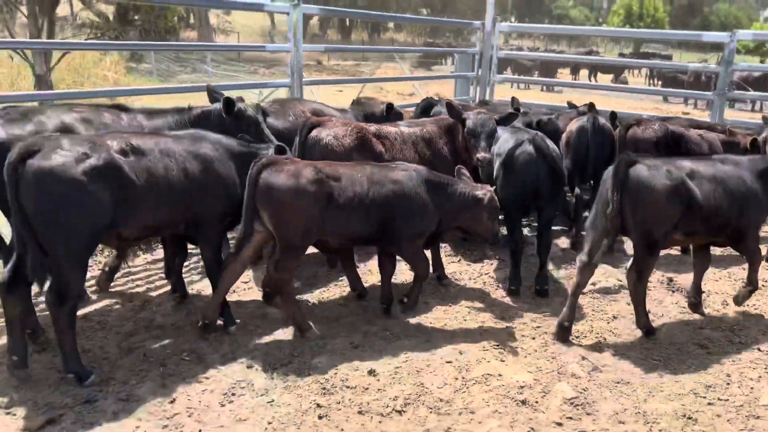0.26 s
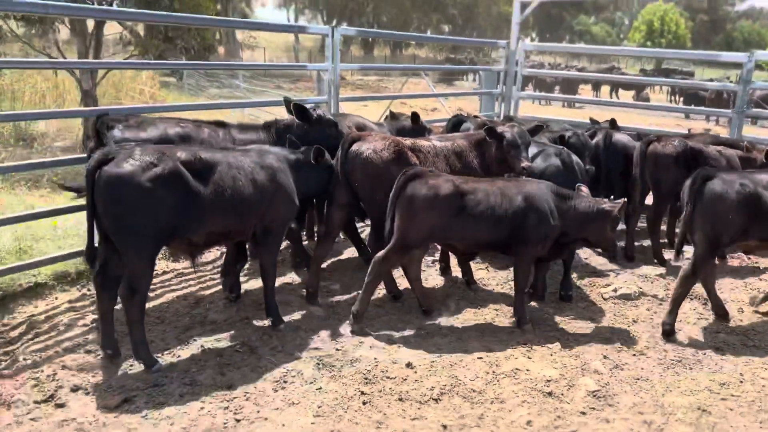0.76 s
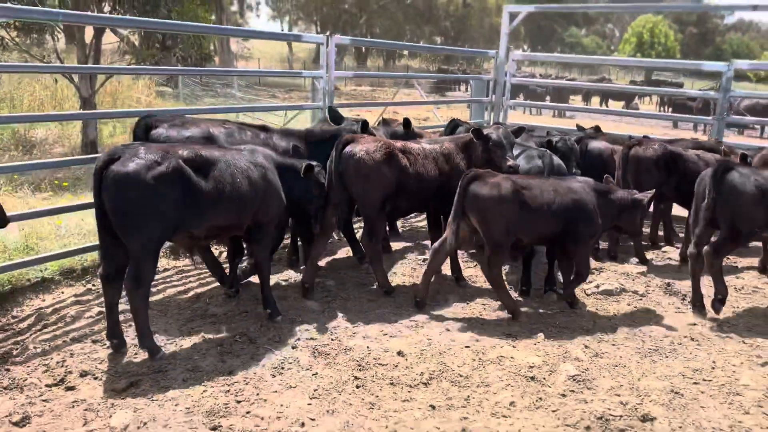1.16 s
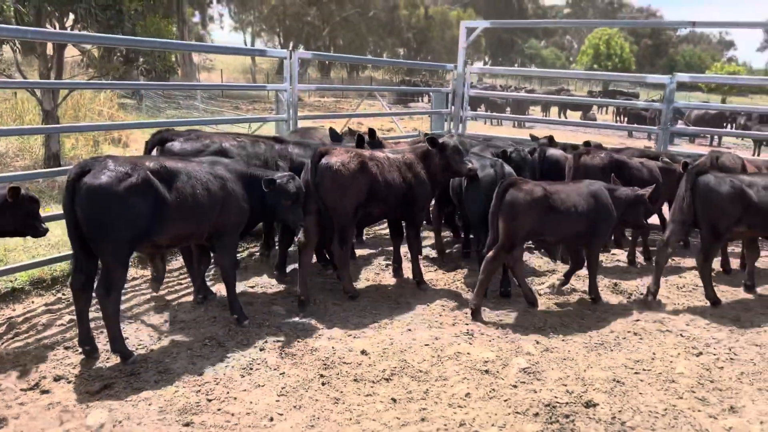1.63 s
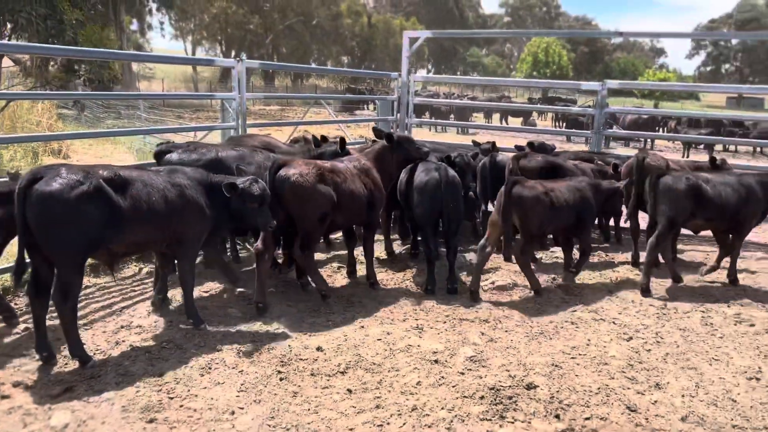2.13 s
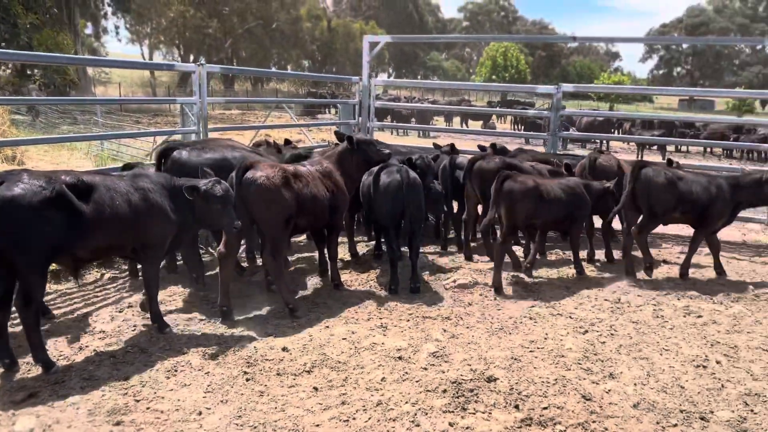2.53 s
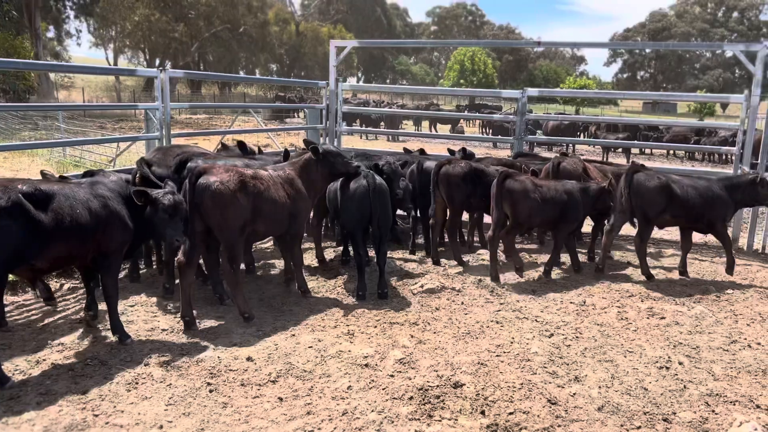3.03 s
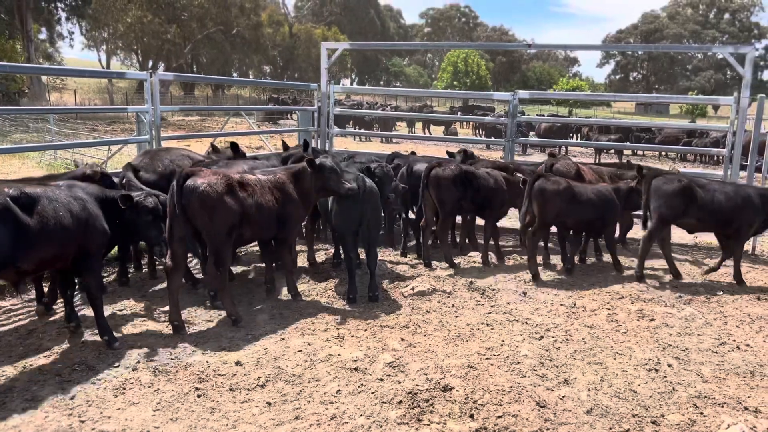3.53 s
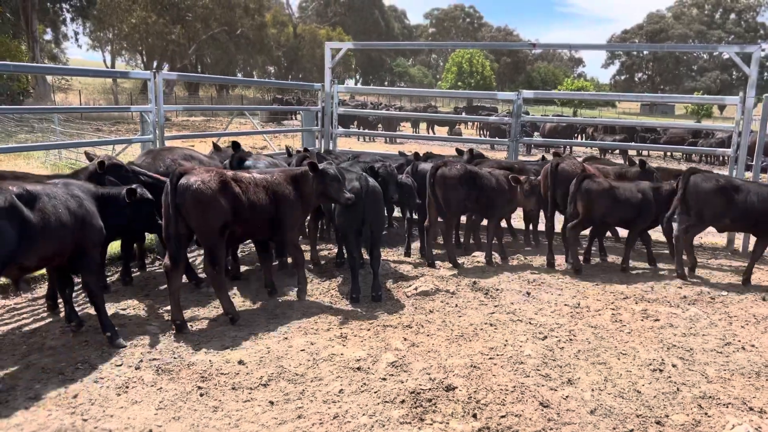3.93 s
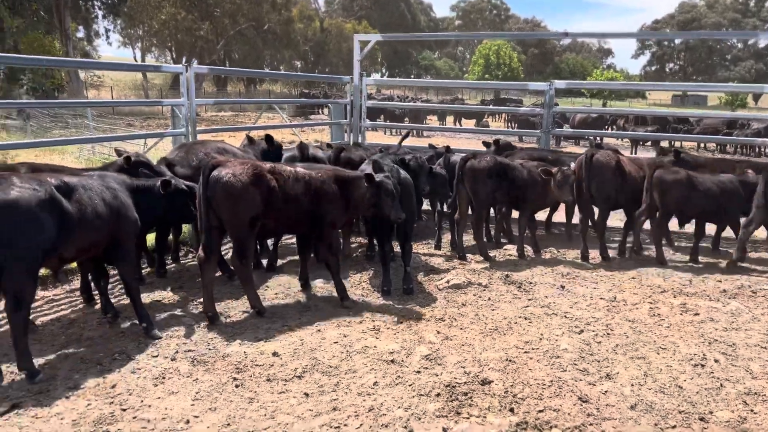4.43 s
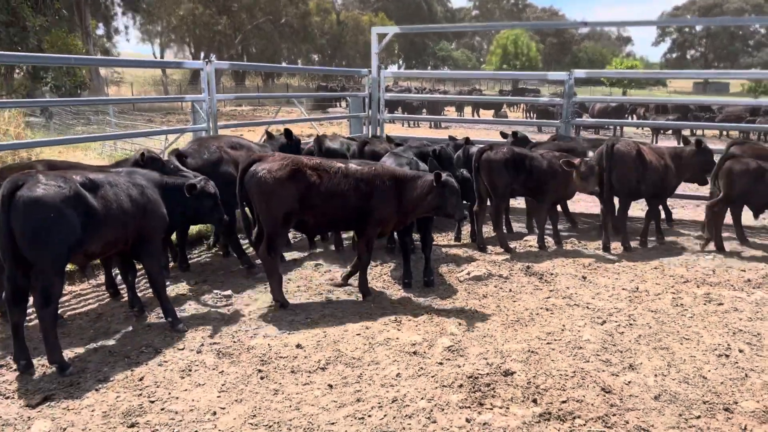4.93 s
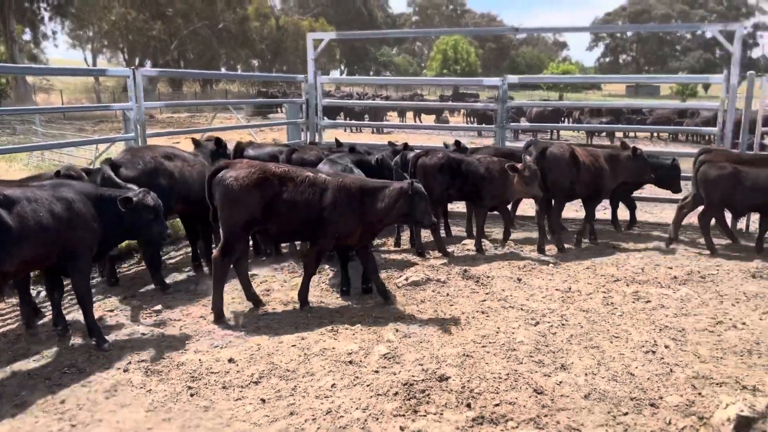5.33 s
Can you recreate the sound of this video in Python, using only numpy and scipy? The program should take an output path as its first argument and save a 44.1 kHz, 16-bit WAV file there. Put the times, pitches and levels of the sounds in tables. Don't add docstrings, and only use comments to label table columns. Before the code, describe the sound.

A breezy open cattle yard, heard through a small stereo microphone with low wind rumble and soft scuffing on dry dirt. At 0 s the tail of a loud, shrill calf bawl breaks roughly and stops by 0.25 s; a distant breathy call answers until 0.5. Gusts buffet around 0.4 and thump hard at 1.0, over a faint low moo. A tiny rising yelp at 0.9 leads into a high, buzzing two-voiced cry with a whistling edge, 1.0 to 1.6. The wind drops; hooves knock softly near 2.1. A growling low moo climbs from 2.2 to 2.9, joined by a clear mid-pitched call, 2.6 to 3.5, and blurred far lowing. Hard knocks land at 3.5 and 3.9, then a faint snort. From 4.0 a near animal hums, opening at 4.55 into a deep bawl; another rises across it, loudest near 5.4, then cracks downward by 5.6. Grit ticks, brief scrapes and short echoes surround them.

```python
import sys
import numpy as np
from scipy import signal
from scipy.io import wavfile
from scipy.ndimage import uniform_filter1d

SR = 44100
rng = np.random.default_rng(int(sys.argv[2]) if len(sys.argv) > 2 else 0)


def transcribe(signal):
    frames = np.atleast_2d(signal).T
    limited = np.clip(frames, -1, 1)
    pcm = np.round(limited * 32767).astype(np.int16)
    wavfile.write(sys.argv[1], SR, pcm)


def how_loud(loudness_db):
    steps = np.asarray(loudness_db, float) / 20
    return 10 ** steps


N = 246078


def evened(x, size=None):
    power = np.mean(x ** 2) if size is None else uniform_filter1d(x ** 2, size)
    return x / np.sqrt(abs(power) + 1e-20)


def read(points, hz):
    f, value = np.transpose(points)
    return np.interp(np.log(hz + 1), np.log(f + 1), value)


def columns(rows, t):
    s, *rest = np.transpose(rows)
    return [np.interp(t, s, c) for c in rest]


def swells(base_db, rows, t):
    power = how_loud(base_db) ** 2
    for s, db, span in rows:
        power = power + how_loud(db - 20 * abs(t - s) / span) ** 2
    return np.sqrt(power)


def place(s, sound, pan_db, lag):
    out = np.zeros((2, N + len(sound) + 64))
    for side, late in ((0, max(-lag, 0)), (1, max(lag, 0))):
        at = round(s * SR + late)
        out[side, at:at + len(sound)] = sound * how_loud(pan_db * (.5 - side))
    return out[:, :N]


def noise(points, same, lag, size, patchy_db):
    frames, hz = 4 * N // size + 5, np.fft.rfftfreq(size, 1 / SR)
    a, b, c, d, patches = rng.standard_normal((frames, len(hz), 5)).T
    patches = uniform_filter1d(patches, size // 80, 0)
    patches = evened(uniform_filter1d(patches, 8192 // size, 1))
    late = np.exp(-2j * np.pi * hz * lag / SR)[:, None]
    left, other = a + 1j * b, c + 1j * d
    z = np.array([left, same * late * left + np.sqrt(1 - same ** 2) * other])
    inside = (hz >= points[0][0]) & (hz <= points[-1][0])
    z *= how_loud(read(points, hz)[:, None] + patchy_db * patches) * inside[:, None]
    return evened(signal.istft(z, nperseg=size, noverlap=3 * size // 4)[1][:, :N])


def resonate(x, hz, width):
    hz = np.clip(hz, 20, SR / 2 - 2000)
    return signal.lfilter(*signal.iirpeak(hz, hz / width, SR), x)


def burst(peak_db, hz, width, t60, rise, push=0.):
    t = np.arange(6000) / SR
    kick = rng.standard_normal(len(t)) * how_loud(-60 * t / max(t60, .005)) * np.minimum(t / rise, 1)
    kick = kick + push * (t == 0)
    ring = resonate(kick, hz, width)
    for _ in range(2):
        ring = resonate(ring, hz, 2 * width)
    return how_loud(peak_db) * ring / abs(ring).max()


def glide(x, hz, width):
    turn, r = np.exp(2j * np.pi * np.cumsum(hz) / SR), np.exp(-np.pi * width / SR)
    smooth = signal.lfilter([(1 - r) ** 2], [1, -2 * r, r * r], x / turn + 1e-18)
    return 2 * (turn * smooth).real


def folds(hz, jitter):
    wobble = evened(uniform_filter1d(rng.standard_normal(len(hz)), 500))
    turns = np.cumsum(hz * (1 + jitter * wobble)) / SR
    top = int(8000 / hz.mean())
    pulses = np.sin(np.pi * (2 * top + 1) * turns) / (np.sin(np.pi * turns) + 1e-12) - 1
    return turns, evened(pulses)


def through(drive, shape, open_db, jaw, sign):
    window = round(.03 * SR)
    drift = uniform_filter1d(rng.standard_normal((len(shape), len(drive))), window, axis=1)
    waver_db = 1.3 * evened(uniform_filter1d(drift, window, axis=1))
    out = 0
    for k, (hz, width, db) in enumerate(shape):
        upper = k > 0
        gain = sign ** k * how_loud(db + (waver_db[k] + open_db) * upper)
        out = out + gain * glide(drive, hz * jaw ** upper, 0.94 * width)
    return out


# share of breath while it holds (0-1), share at its end (0-1),
# length of the break in seconds.
ROUGHNESS = dict(shrill=(.09, .75, .13), moo=(.09, .1, .1), yelp=(.07, .1, .03), twin=(.12, 1, .1),
             arch=(.05, .2, .06), clear=(.05, .18, .12), growl=(.05, .5, .35), answer=(.3, .5, .25),
             snort=(.95, .95, .1), herd=(.7, .7, .3), deep=(.025, .2, .25), rising=(.04, .4, .16))


def bawl(rows, pitch, hoarse, throat, pan_db, lag, half=0., second=None, mouth=(1, 1), shut=None, sign=-1):
    t = np.arange(rows[0][0], rows[-1][0], 1 / SR)
    level_db, open_db = (columns(rows, t) + [0 * t])[:2]
    hz, = columns(pitch, t)
    hold, end, break_s = hoarse
    rough = hold + (end - hold) * np.clip(1 - (t[-1] - t) / break_s, 0, 1)
    turns, pulses = folds(hz, .0013 + .08 * rough ** 2)
    pulses = pulses * (1 + half * rough ** 2 * np.cos(np.pi * turns))
    if second:
        other_hz, other_db = columns(second, t)
        other = folds(other_hz, .002)[1]
        pulses = pulses * (1 + 0.39 * other) + how_loud(other_db) * other
    puffs = (1.2 + np.exp(-(turns % 1) / 0.22)) * rng.standard_normal(len(t))
    drive = (1 - rough) * evened(pulses) + rough * evened(puffs)
    jaw = np.interp(t, np.linspace(t[0], t[-1], len(mouth)), mouth)
    voice = evened(through(drive, throat, open_db, jaw, sign), size=3000)
    if shut:
        parted = np.clip((t - 4.548) / .006, 0, 1)
        hum = evened(through(drive, shut, open_db, jaw, sign), size=3000)
        voice = parted * voice + (1 - parted) * how_loud(-2.5) * hum
    fade_in = t - t[0] + (t[0] == 0)
    fade_out = t[-1] - t + (rows[-1][0] > 5.5)
    edge = np.clip(np.minimum(fade_in, fade_out) / .025, 0, 1)
    return place(t[0], how_loud(level_db) * voice * edge, pan_db, lag)


# time in seconds, rumble in dB.
BREEZE_LEVEL = [(0, -33.5), (.5, -42), (.7, -38.5), (1.1, -37), (1.4, -40.5), (1.8, -66.5), (2.67, -35.5),
                (3.2, -52.5), (3.5, -36), (3.9, -45), (4.15, -40), (4.45, -46), (4.7, -44), (5, -42.5),
                (5.3, -46), (5.58, -44)]
# peak time in seconds, peak in dB, seconds to swell or die by 20 dB.
GUST_SWELLS = [(0.112, -28.5, 0.19), (0.323, -24, 0.09), (0.422, -22.5, 0.02), (.6, -36, 0.16),
               (1.01, -21.5, 0.123), (1.36, -40.5, 0.36), (3.332, -25, 0.04), (3.48, -29, 0.01),
               (3.661, -33, 0.22), (3.97, -31, 0.04), (4.223, -26.5, 0.14), (4.33, -32.5, 0.13),
               (4.6, -36.5, 0.17), (4.76, -33, 0.14), (4.86, -33, 0.12), (5.071, -32, 0.3)]
# frequency in Hz, level in dB.
RUMBLE_COLOUR = [(22, -22), (32, -35.5), (45, -4), (62, -3.5), (95, -4), (140, -13), (190, -15)]
# start in seconds, peak in dB, centre in Hz, t60 in seconds.
PORT_BLOWS = [
    (0.292, -38, 87, 0.36),
    (0.414, -30, 120.3, 0.17),
    (0.82, -36.5, 96, 0.12),
    (0.996, -14.5, 170, 0.09),
    (1.504, -35, 176, 0.33),
    (2.327, -24, 161, 0.066),
    (2.492, -27.5, 228, 0.15),
    (4.083, -29.5, 174, 0.3),
    (4.232, -24, 190, 0.09),
]


def wind():
    t = np.arange(N) / SR
    blowing = swells(columns(BREEZE_LEVEL, t)[0], GUST_SWELLS, t)
    drift = uniform_filter1d(uniform_filter1d(rng.standard_normal(N), 900), 900)
    lumps = evened(how_loud(1.7 * evened(drift)))
    rumble = noise(RUMBLE_COLOUR, 0.9, 24, size=4096, patchy_db=1.5) * blowing
    flutter_colour = [(110, -33.5), (160, -4.0), (260, -10), (420, -29.0)]  # (Hz, dB)
    flutter = noise(flutter_colour, 0.97, 12.0, size=2048, patchy_db=-1.0)
    flutter = flutter * blowing * how_loud([[-11.], [-9.]])
    blows = sum(place(s, burst(db, hz, 113, t60, 0.0029, push=18.8), -0.98, 11)
                for s, db, hz, t60 in PORT_BLOWS)
    return rumble * lumps ** 0.51 + flutter * lumps + blows


# time in seconds, level in dB.
BED_LEVEL = [(0, -43), (.2, -44.5), (.3, -55), (.9, -50), (1.52, -48), (1.62, -52), (1.85, -60), (2.18, -64),
             (2.42, -49), (3.55, -52.5), (4.15, -55), (4.3, -59), (4.5, -58), (4.65, -47), (5.4, -47),
             (5.58, -45)]
# frequency in Hz, level in dB.
WASH_COLOUR = [(88, -39), (150, -15.5), (216, -4), (282, -10), (432, -9.5), (563, -8.5), (1230, -7.5),
               (1620, -15), (1770, -16), (3050, -24.5), (3960, -40.5), (6710, -120)]
# frequency in Hz, level in dB.
SCUFF_COLOUR = [(1500, 1.5), (2200, 2.5), (3100, 2.5), (3900, 0), (5000, 1), (6400, -1), (7300, -7.5),
                (9000, -12.5), (10300, -25.5), (11400, -26.5), (14000, -32), (15700, -31.5)]
# peak time in seconds, peak in dB, seconds to swell or die by 20 dB.
HOOF_SHUFFLES = [
    (0, -50.5, 0.2),
    (.4, -60, 0.3),
    (.71, -60, 0.24),
    (2.5, -72, 3),
    (3.06, -60, 0.23),
    (4.059, -54.5, 0.25),
    (5.19, -59, 1),
]


def yard():
    t = np.arange(N) / SR
    bed_db, = columns(BED_LEVEL, t)
    wash = noise(WASH_COLOUR, 0.27, 6.8, size=1024, patchy_db=3.5) * how_loud(bed_db)
    scuffing = swells(-67 + 0.6 * (bed_db + 52), HOOF_SHUFFLES, t)
    scuffs = noise(SCUFF_COLOUR, 0.1, 7.3, size=256, patchy_db=3.0) * scuffing * how_loud([[3.5], [1.5]])
    hiss_colour = [(11000, -1.5), (12500, -0.5), (14500, -4.5), (15700, -12.5)]  # (Hz, dB)
    hiss = noise(hiss_colour, 0.94, 2.71, size=256, patchy_db=6.0)
    return wash + scuffs + how_loud(-79) * hiss


# time in seconds, level in dB, lift of the upper resonances in dB.
SHRILL_EFFORT = [(0, -30, 4.5), (.1, -29.5, 2), (.14, -31.5, -3), (.165, -37, 7.5), (.185, -49, 3.5),
                 (.205, -45, 10), (.24, -68, 9)]
# time in seconds, fold rate in Hz.
SHRILL_RATE = [(0, 588), (.08, 574), (.14, 553), (.17, 548), (.24, 560)]
# resonance in Hz, width in Hz, level in dB.
SHRILL_RESONANCES = [(590, 105, -7.5), (818, 74, 5), (1118, 134, -7), (1770, 330, -12), (2380, 480, -25.5),
                     (2950, 370, -40.5)]


def shrill_calf():
    return bawl(SHRILL_EFFORT, SHRILL_RATE, ROUGHNESS["shrill"], SHRILL_RESONANCES, -0.44, 5.76,
                half=7.1, mouth=(.98, 1.02))


# start in seconds, peak in dB before an 11 dB lift.
GRIT_TICKS = [(.003, -45), (0.6782, -56), (0.872, -53.5), (1.06, -60.5), (1.193, -58.5), (1.3013, -52.5),
              (2.0294, -59), (2.0454, -56.5), (2.1514, -65), (2.3695, -62), (2.9213, -56.5), (3.3383, -54),
              (3.482, -51.5), (3.632, -61.5), (3.719, -64), (3.7458, -66.5), (3.917, -54), (4.0315, -54),
              (4.193, -56), (4.4175, -46.5), (5.01, -63), (5.179, -56), (5.4637, -48), (5.5653, -60)]


def grit_ticks():
    return sum(place(s, burst(db + 11, 7200, 9500, .011, .0004, push=4.4), 4.3, 2.5)
               for s, db in GRIT_TICKS)


# time in seconds, level in dB, lift of the upper resonances in dB.
ANSWER_EFFORT = [(.19, -52, -12), (.26, -55, -8), (.33, -59.5, -1), (.41, -50.5, 4), (.5, -57, 2)]
# time in seconds, fold rate in Hz.
ANSWER_RATE = [(.19, 571), (.36, 590), (.5, 580)]
# resonance in Hz, width in Hz, level in dB.
ANSWER_RESONANCES = [(580, 100, -7.5), (840, 92, -3), (1137, 100, -2.5), (1740, 200, -6.5), (2390, 270, 0),
                     (2900, 250, -10)]


def far_answer():
    return bawl(ANSWER_EFFORT, ANSWER_RATE, ROUGHNESS["answer"], ANSWER_RESONANCES, -0.5, 5.5, half=5.7)


# time in seconds, level in dB.
MOO_EFFORT = [(.35, -62), (.6, -56), (.95, -53), (1.15, -55), (1.4, -62)]
# time in seconds, fold rate in Hz.
MOO_RATE = [(.35, 89), (.95, 95.5), (1.4, 90)]
# resonance in Hz, width in Hz, level in dB.
MOO_RESONANCES = [(275, 120, -1.5), (760, 250, -13), (1380, 650, -20)]


def low_moo():
    return bawl(MOO_EFFORT, MOO_RATE, ROUGHNESS["moo"], MOO_RESONANCES, -1.5, 7.5)


# start in seconds, peak in dB, centre in Hz, t60 in seconds.
RAIL_SCRAPES = [(0.677, -39, 2950, 0.062), (1.08, -51, 5040, 0.095), (1.965, -50.5, 5100, .02),
                (2.518, -43, 4870, 0.087), (3.085, -48, 5440, 0.083), (3.683, -53, 2660, 0.12),
                (3.882, -49, 5800, .08), (4.148, -49, 5800, 0.11), (4.426, -55, 12700, .03),
                (5.07, -67, 13690, 0.12), (5.463, -32.5, 5260, 0.026), (5.506, -63, 14000, .03),
                (5.179, -35.5, 4900, 0.042)]


def scrapes():
    return sum(place(s, burst(db, hz, hz / 6, t60, t60 ** 2), 6.5, 4.5)
               for s, db, hz, t60 in RAIL_SCRAPES)


# time in seconds, level in dB.
YELP_EFFORT = [(0.87, -55.5), (0.99, -48.5)]
# time in seconds, fold rate in Hz.
YELP_RATE = [(.87, 200), (.99, 229)]
# resonance in Hz, width in Hz, level in dB.
YELP_RESONANCES = [(1115, 120, -3), (1320, 130, 2)]


def yelp():
    return bawl(YELP_EFFORT, YELP_RATE, ROUGHNESS["yelp"], YELP_RESONANCES, 2.5, -2.5)


# time in seconds, level in dB.
WHISTLE_EFFORT = [(.99, -56), (1.05, -51), (1.15, -53)]
# time in seconds, fold rate in Hz.
WHISTLE_RATE = [(.99, 1320), (1.07, 1360), (1.15, 1380)]


def flat_whistle():
    return bawl(WHISTLE_EFFORT, WHISTLE_RATE, ROUGHNESS["arch"], YELP_RESONANCES, -0.8, -4.5)


# time in seconds, level in dB, lift of the upper resonances in dB.
TWIN_EFFORT = [(1, -53, 1), (1.12, -42, -2), (1.44, -39.5, -5), (1.47, -44, -2), (1.49, -46.5, 12),
               (1.53, -47, 12.5), (1.57, -56, 4)]
# time in seconds, fold rate in Hz.
TWIN_RATE = [(1, 736), (1.45, 727), (1.48, 700), (1.56, 690)]
# time in seconds, rate in Hz, level in dB against the first.
TWIN_SECOND = [(1, 612, -14), (1.17, 672, -6), (1.26, 663, -8), (1.3, 665, 1), (1.41, 660, 1),
               (1.5, 592, -6), (1.56, 600, -12)]
# resonance in Hz, width in Hz, level in dB.
TWIN_RESONANCES = [(710, 130, 0), (805, 70, -3), (1000, 160, -13), (1340, 110, -5), (1460, 80, -14),
                   (2030, 150, -18), (2750, 180, -16), (3330, 250, -17)]


def two_voiced_calf():
    return bawl(TWIN_EFFORT, TWIN_RATE, ROUGHNESS["twin"], TWIN_RESONANCES, -1.0, -5.5,
                second=TWIN_SECOND, sign=0.93)


# time in seconds, level in dB.
ARCH_EFFORT = [(1.01, -50.5), (1.14, -47.5), (1.3, -50), (1.42, -42), (1.5, -44)]
# time in seconds, fold rate in Hz.
ARCH_RATE = [(1.01, 1230), (1.13, 1296), (1.17, 1345), (1.27, 1326), (1.37, 1340), (1.41, 1310),
             (1.5, 1180)]


def arching_whistle():
    throb = 1 + .7 * np.cos(2 * np.pi * 66 * np.arange(N) / SR)
    return throb * bawl(ARCH_EFFORT, ARCH_RATE, ROUGHNESS["arch"], TWIN_RESONANCES[2:5], -0.81, -7.5)


# start in seconds, peak in dB, centre in Hz, t60 in seconds, left minus right in dB.
HOOF_KNOCKS = [
    (2.089, -48, 700, .03, -2),
    (2.112, -44, 650, .03, 1.5),
    (2.231, -37, 620, .035, -5),
    (3.459, -31, 1100, .05, -2),
    (3.915, -31, 550, .025, -.5),
]


def hoof_knocks():
    return sum(place(s, burst(db, hz, 440, t60, .0004, push=8.5), pan_db, 10.3)
               for s, db, hz, t60, pan_db in HOOF_KNOCKS)


# time in seconds, level in dB, lift of the upper resonances in dB.
GROWL_EFFORT = [(2.15, -65, 6), (2.25, -60, 2), (2.4, -50.5, 2.5), (2.5, -45, -3.5), (2.6, -43.5, -9),
                (2.65, -44.5, -10), (2.95, -49.5, -12)]
# time in seconds, fold rate in Hz.
GROWL_RATE = [(2.15, 72), (2.24, 73), (2.45, 96), (2.67, 99), (2.82, 106), (2.95, 104)]
# resonance in Hz, width in Hz, level in dB.
GROWL_RESONANCES = [(213, 100, -2), (480, 54, -30), (1680, 190, -21.5), (2600, 220, -21), (3020, 300, -14),
                    (4830, 400, -19)]


def growl():
    return bawl(GROWL_EFFORT, GROWL_RATE, ROUGHNESS["growl"], GROWL_RESONANCES, -1.5, 5.5)


# time in seconds, level in dB.
HERD_CALLS = [
    [(2.25, -84), (2.374, -45), (3.29, -44.5), (3.44, -45), (3.476, -40.5), (3.53, -76.5)],
    [(3.6, -54), (3.716, -42.5), (3.9, -54.5)],
]
# time in seconds, fold rate in Hz.
HERD_RATE = [(2.25, 80), (3, 85), (3.9, 80)]
# resonance in Hz, width in Hz, level in dB.
HERD_RESONANCES = [(246.6, 131, 10.5), (530, 170, -5), (962, 106, 2), (1260, 147, 3), (1620, 230, -15)]


def far_herd():
    return sum(bawl(call, HERD_RATE, ROUGHNESS["herd"], HERD_RESONANCES, -0.81, 8.5) for call in HERD_CALLS)


# time in seconds, level in dB, lift of the upper resonances in dB.
CLEAR_EFFORT = [(2.55, -58.5, 0), (2.66, -44, -4), (2.85, -44.5, -3), (3.08, -46, -3), (3.22, -44, -5),
                (3.3, -39, 1), (3.36, -46.5, -2), (3.46, -46, -15)]
# time in seconds, fold rate in Hz.
CLEAR_RATE = [(2.55, 375), (2.64, 394), (2.82, 417), (2.93, 426), (3.15, 415), (3.25, 414), (3.35, 385),
              (3.46, 310)]
# resonance in Hz, width in Hz, level in dB.
CLEAR_RESONANCES = [(410, 150, 0), (890, 260, -4), (1190, 70, 1.5), (1800, 250, -22), (5900, 500, -19)]


def clear_calf():
    return bawl(CLEAR_EFFORT, CLEAR_RATE, ROUGHNESS["clear"], CLEAR_RESONANCES, -3.5, 3, mouth=(.87, 1.01))


# time in seconds, level in dB.
SNORT_EFFORT = [(3.85, -64), (3.95, -61), (4.03, -60), (4.1, -57), (4.13, -71), (4.22, -68)]
# resonance in Hz, width in Hz, level in dB.
NOSE_RESONANCES = [(2730, 450, -6), (3870, 400, -13), (4720, 450, 3), (5800, 500, -1.5), (6450, 500, -5),
                   (7650, 460, -11)]


def snort():
    return bawl(SNORT_EFFORT, HERD_RATE, ROUGHNESS["snort"], NOSE_RESONANCES, 8.1, 4.0, sign=1)


# time in seconds, level in dB, lift of the upper resonances in dB.
DEEP_EFFORT = [(3.98, -57, 8), (4.04, -43.5, 0), (4.24, -51.5, 4), (4.45, -34, -7), (4.56, -33, -4.5),
               (4.8, -29.5, -4), (5.0, -33.5, -5), (5.1, -31.5, -15), (5.26, -33, -30)]
# time in seconds, fold rate in Hz.
DEEP_RATE = [(3.98, 74.5), (4.27, 72.8), (4.34, 75.5), (4.54, 89.4), (4.602, 91.7), (4.656, 95.7),
             (4.83, 101), (5.004, 107.3), (5.26, 108.5)]
# resonance in Hz, width in Hz, level in dB.
DEEP_RESONANCES = [(203, 100, -3), (510, 110, -4.5), (797, 102, 2.5), (1080, 118, -1), (1524, 120, -3.5),
                   (1840, 400, -8.5), (2380, 110, -17), (5600, 600, -37.5)]
# resonance in Hz, width in Hz, level in dB.
HUM_RESONANCES = [(88, 60, 9), (170, 90, 15), (330, 200, 3), (520, 200, 2), (710, 110, 10), (1000, 300, -1),
                  (1230, 120, -3), (1670, 200, 3), (1900, 200, -3), (5660, 900, -28)]


def deep_calf():
    return bawl(DEEP_EFFORT, DEEP_RATE, ROUGHNESS["deep"], DEEP_RESONANCES, -3.5, 8.5,
                mouth=(1.01, 1.04), shut=HUM_RESONANCES, sign=0.97)


# time in seconds, level in dB, lift of the upper resonances in dB.
RISING_EFFORT = [(4.55, -40.5, -14), (4.68, -32, -9), (4.8, -31, -8.5), (4.91, -28, -0.5),
                 (5.05, -31.5, -2.5), (5.15, -29.5, 3), (5.41, -27, 2), (5.47, -27, -1.5),
                 (5.58, -36.5, -9)]
# time in seconds, fold rate in Hz.
RISING_RATE = [(4.5, 90), (4.682, 106), (4.914, 131.1), (5.082, 159.3), (5.218, 170.8), (5.332, 178),
               (5.414, 175.1), (5.5, 126.6), (5.58, 133.4)]
# resonance in Hz, width in Hz, level in dB.
RISING_RESONANCES = [(238.3, 103, 7.5), (529, 39, -5), (702, 125, -13), (889, 64, -5.5), (1025, 116, -2),
                     (1200, 72, -1.5), (1451, 150, -6.5), (1790, 510, -16.5), (2410, 250, -22.5),
                     (2980, 250, -29), (3680, 160, -29.5)]


def rising_calf():
    return bawl(RISING_EFFORT, RISING_RATE, ROUGHNESS["rising"], RISING_RESONANCES, -2.7, 8.64,
                mouth=(0.95, 0.976, 0.992, 1.007, 1.02, 0.948), sign=0.99)


# frequency in Hz, t60 in seconds.
ECHO_DECAY = [(100, 1), (600, 0.6), (1500, 0.43), (4000, 0.21), (10000, 0.024)]


def echoes(x):
    taps = np.zeros((2, SR))
    at = np.arange(400, SR - 20, 20) + rng.integers(0, 20, (2, (SR - 401) // 20))
    np.put_along_axis(taps, at, rng.choice([-1., 1.], at.shape), 1)
    hz, t, z = signal.stft(taps, SR, nperseg=256)
    fading = how_loud(-60 * t / read(ECHO_DECAY, hz)[:, None])
    tail = signal.istft(z * fading, SR, nperseg=256)[1]
    return signal.fftconvolve(x, tail / np.linalg.norm(tail[0]), axes=1)[:, :N]


def scene():
    early = shrill_calf() + far_answer() + low_moo() + yelp()
    paired = flat_whistle() + two_voiced_calf() + arching_whistle()
    middle = growl() + far_herd() + clear_calf() + snort()
    crossing = deep_calf() + rising_calf()
    hooves = grit_ticks() + scrapes() + hoof_knocks()
    near = early + paired + middle + crossing + hooves
    return near + how_loud(-15.5) * echoes(near) + wind() + yard()


def top_cut(x):
    return signal.sosfilt(signal.butter(12, 15800, fs=SR, output="sos"), x)


def record(dry):
    return top_cut(dry)


dry = scene()
out = record(dry)
transcribe(out)
```